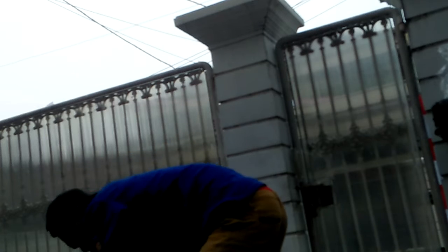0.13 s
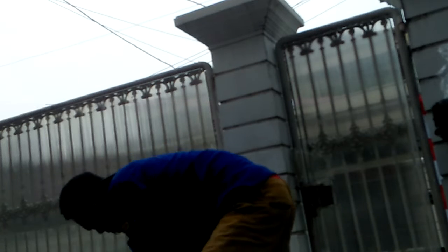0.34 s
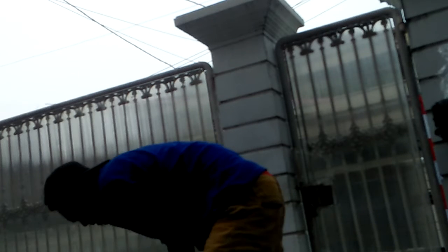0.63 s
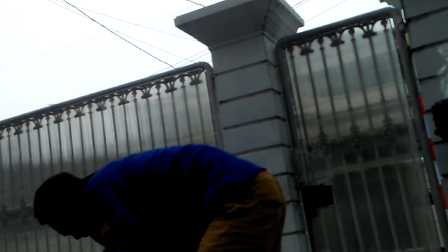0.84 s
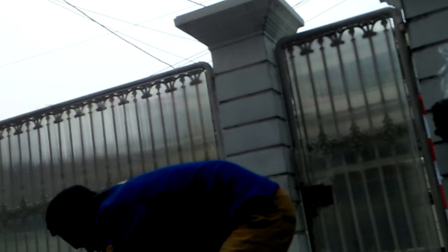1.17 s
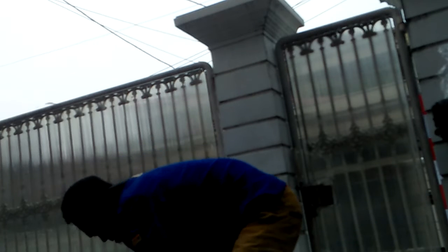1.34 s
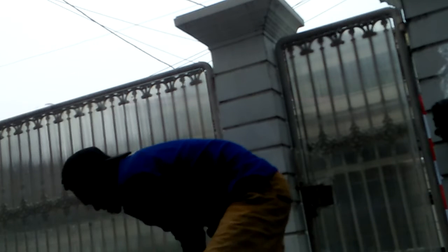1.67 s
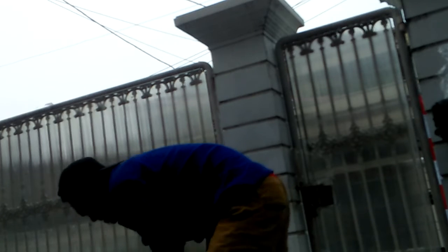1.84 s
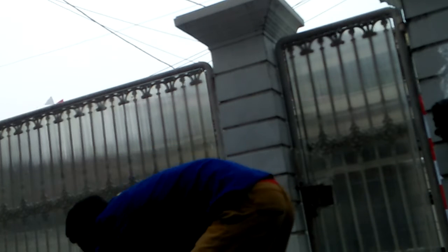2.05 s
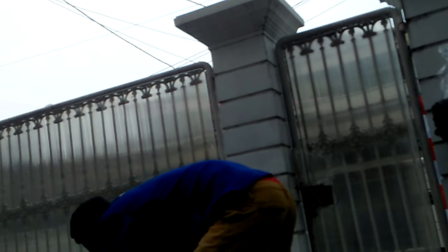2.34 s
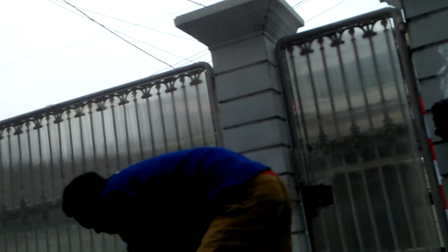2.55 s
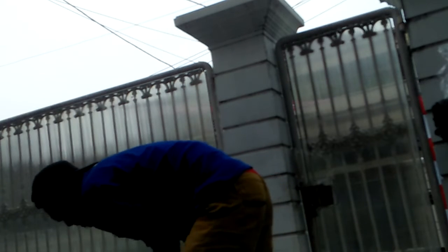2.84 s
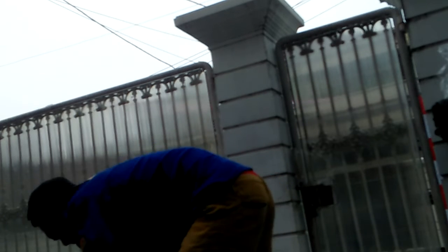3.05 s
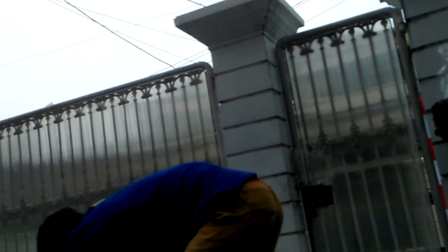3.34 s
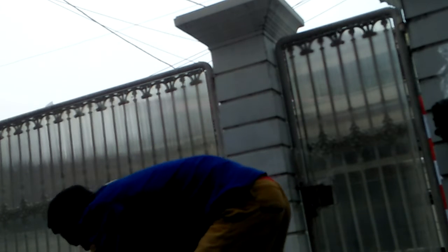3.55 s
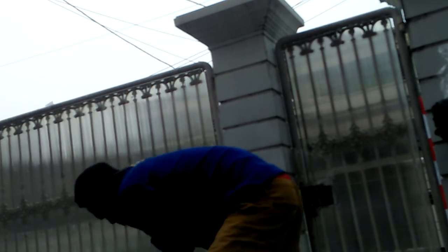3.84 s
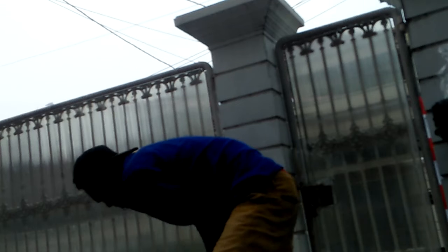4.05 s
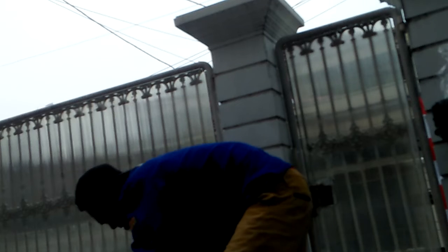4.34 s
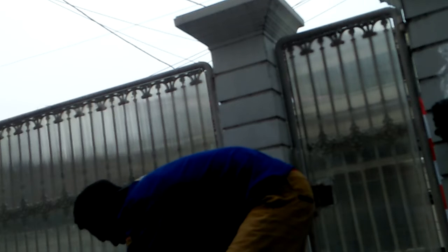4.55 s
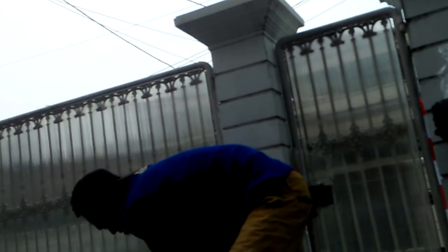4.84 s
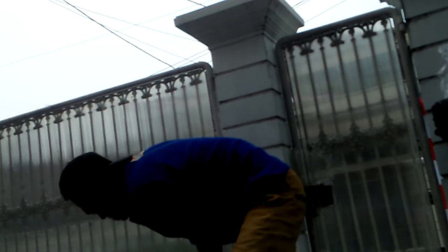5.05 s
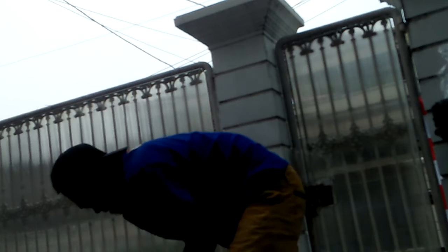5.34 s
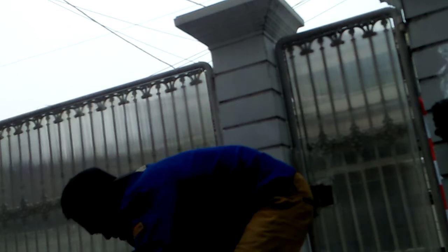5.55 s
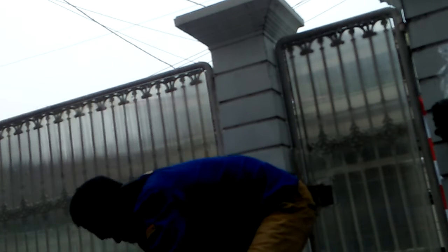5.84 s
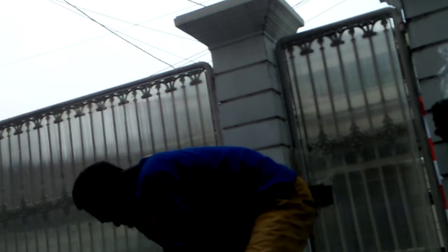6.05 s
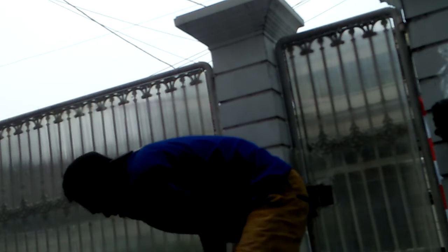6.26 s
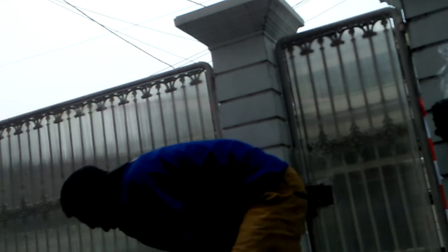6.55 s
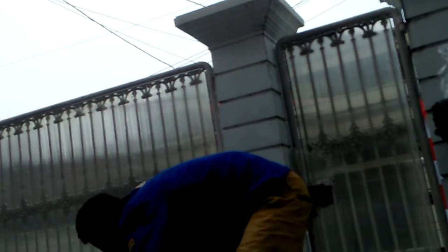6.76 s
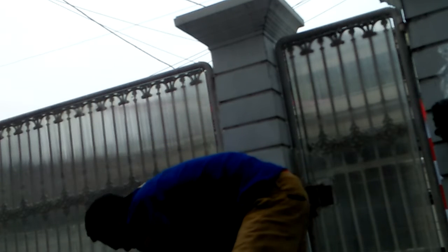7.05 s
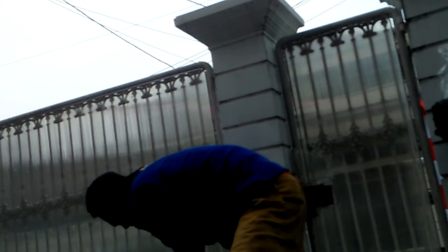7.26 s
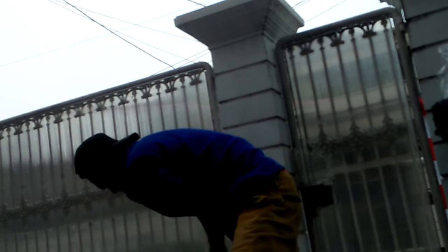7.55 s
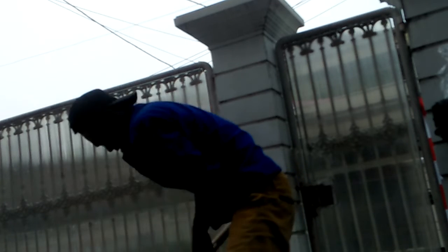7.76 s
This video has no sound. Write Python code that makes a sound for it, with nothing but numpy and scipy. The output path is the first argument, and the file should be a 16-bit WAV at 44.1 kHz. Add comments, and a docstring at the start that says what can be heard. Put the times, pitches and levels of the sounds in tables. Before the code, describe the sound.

A person bent over a gravel heap digs with a steel shovel at a regular pace. The blade rasps and rattles into loose stones, the steel ringing briefly before the load muffles it. Pebbles clack, low thuds mark pushes and footfalls, thrown grit hisses faintly, and stones tumble down with woody knocks and a small squeak. Gaps are almost silent. Outdoor yard, hard walls nearby, microphone close and centred.

```python
"""A steel shovel digs into a gravel heap seven times in a walled garden; the first stroke is under way.
Random stone contacts, filtered by the resonances of the shovel, give grit, stones, sand and heap.
Their levels rise as the edge bites and the push builds, then fall as the load is lifted.
Decaying tones, modes and noise bursts give jolts, clinks, chirps, knocks, thuds of the digging and of
footfalls, and squeaks, with wall reflections. Thrown sand hisses and landed stones roll in faint air."""
import sys
import numpy as np
from scipy import signal
from scipy.fft import rfft, irfft
from scipy.io import wavfile

SR = 44100
rng = np.random.default_rng(int(sys.argv[2]) if len(sys.argv) > 2 else 0)


def transcribe(u):
    """Save the signal u as a 16-bit wav file named by the first command-line argument.

    u: samples, shape (n,) or (channels, n), limited to [-1, 1]; the rate is SR.
    q: integer samples, one column per channel.
    """
    v = np.clip(np.atleast_2d(u).T, -1, 1)
    q = np.round(v * 32767).astype(np.int16)
    wavfile.write(sys.argv[1], SR, q)


N = 348831
SIZE = 16384  # samples of a filter response or a struck sound
FREQS = np.maximum(np.arange(SIZE // 2 + 1) * SR / SIZE, 1)  # Hz
AGE = np.arange(SIZE) / SR  # s since a sound began
TIME = np.arange(N) / SR  # s
CLOCK = np.arange(0, N / SR + .01, .001)  # s, coarse clock for level curves

# Strokes: (edge enters [s], full push [s], build-up [s], hold [s], grit gain at full push [dB],
# first bite against full push [dB], trend while held [dB/s], fall on lifting [dB/s],
# then gains against the grit: coarse stones [dB], leading pitch of those stones [Hz],
# sand [dB], shifting heap [dB], singing steel [dB])
STROKES = [ (-0.1, 0.215, 0.15, 0.062, -30, -3.5, 20, 68.5, -1.5, 868, -5, -10.5, 8.5),
           (1.227, 1.407, 0.11, 0.044, -33.5, -13.5, -8.5, 90.2, -2, 1105, -1.5, -9, -4),
           (2.395, 2.534, 0.073, 0.11, -32.5, -13.5, -24.5, 76.3, -3, 1172, -4.5, -16, 8),
           (3.443, 3.668, 0.097, 0.24, -31.5, -15, 15.5, 89.3, -3.5, 1060, -5, -14.5, 0),
           (4.695, 4.982, 0.1, 0.21, -33.5, -9.5, -21, 125.5, -8, 1257, -5, -13.5, -5.5),
           (5.807, 5.981, 0.083, 0.29, -34.5, -10.5, -18.5, 103.5, 0, 970, -4.5, -16.5, -0.5),
           (6.97, 7.208, 0.3, 0.12, -34.5, -13.5, 0.5, 102.8, -1, 1040, -3.5, -10.5, -6)]
# The load slides on the lifted blade:
# (time [s], hold [s], grit gain [dB], fall [dB/s], coarse stones against the grit [dB])
SLIDES = [(0.727, 0.011, -45.5, 112.5, -10), (1.597, 0.017, -36, 279.5, -7), (1.688, 0.11, -45, 83.5, -3.5),
          (2.833, 0.018, -60.5, 91.5, 3), (6.442, 0.042, -47, 88.5, -3), (7.605, 0.037, -54, 54.5, -5)]
# Resonances of the loaded blade, its thin edge and the shaft:
# (frequency [Hz], nominal width [Hz], nominal lift above the rattle [dB])
BLADE_MODES = [(985, 40, 3), (1308, 45, 8), (1873, 36, 12), (2030, 40, 5), (2196, 34, 9), (2458, 48, 7),
               (2605, 60, 6), (2756, 39, 7), (3025, 47, 7), (3154, 64, 9), (3380, 38, 9), (3528, 50, 9),
               (3736, 37, 8), (3884, 34, 10), (3955, 45, 8), (4050, 40, 8), (4123, 46, 10), (4240, 36, 12),
               (4428, 53, 9), (4584, 45, 10), (4745, 54, 8), (4868, 56, 12), (5071, 40, 9), (5243, 32, 11),
               (5340, 38, 13), (5690, 100, 11), (5840, 100, 11), (6290, 140, 8), (6450, 90, 9),
               (6567, 110, 12), (6860, 140, 6), (7120, 170, 9), (7420, 110, 8)]
EDGE_MODES = [(7950, 85, 8), (8110, 110, 5), (8255, 130, 5), (8441, 107, 3), (8710, 120, 4), (8950, 110, 3),
              (9410, 105, 7), (9715, 115, 6), (10002, 90, 6), (10292, 150, 6), (10540, 120, 4),
              (11143, 195, 6)]
SHAFT_MODES = [(153.8, 57, 6.45), (298.6, 47, 8.7), (453, 50, 8.3), (606.5, 63, 4.9), (744, 24, 6.9)]
# Least damped modes of the blade: (frequency [Hz], relative level [dB])
SINGING_MODES = [(1311, -8), (1873, 0), (2198, -5), (3030, -11), (4238, -6), (5340, -15)]
# Colour of stone on stone: (frequency [Hz], relative level [dB])
GRAVEL_COLOUR = [(25, -37), (70, -14), (370, -22), (600, -5.5), (1100, 5), (1600, 2.5), (2000, 9),
                 (2400, 0), (4500, -7), (6050, -13.5), (7700, -5.5), (8400, 4.5), (9200, -3), (13000, -18)]
# Colour of still garden air: (frequency [Hz], relative spectral level [dB per Hz])
AIR_COLOUR = [(25, -19), (60, 4), (180, -8.5), (400, -15.5), (1500, -16), (2400, -25), (3200, -40.5),
              (14000, -38.5)]
# The blade jolts against big stones:
# (time [s], peak level [dB], treble gain [dB], rattle t60 [s], gain of the ringing steel [dB])
JOLTS = [(0.042, -25, -23, 0.33, -29), (0.413, -21.5, -18, 0.15, -32), (0.556, -32, -7, 0.24, -35),
         (0.7354, -24.5, -31, 0.14, -27), (1.3567, -22.5, -5, 0.086, -47), (1.4105, -19, 9, 0.12, -40),
         (1.593, -17, 12, 0.021, -48), (1.878, -24.5, -6.5, 0.17, -32), (2.4767, -18, -18, 0.44, -27),
         (2.8667, -31, -2, 0.091, -39), (2.9106, -33.5, -12, 0.18, -34), (3.602, -23.5, -7, 0.17, -31),
         (3.6276, -19, -8, 0.068, -40), (3.8731, -13.5, -23, 0.061, -25), (4.093, -29, -5, 0.22, -33),
         (4.2232, -34, -11, 0.098, -44), (4.789, -21.5, 2, 0.1, 1.5), (4.8237, -17.5, -8.5, 0.51, -9),
         (4.9259, -15.5, -0.5, 0.34, -4), (4.9589, -16, -15, 0.048, -49), (5.2488, -29.5, 2, 0.15, -20),
         (5.9505, -19, -10, 0.45, -32), (6.2118, -26.5, -23, 0.055, -30), (6.421, -28.5, 6, 0.032, -34.5),
         (6.738, -39.5, -3, 0.17, -42), (7.178, -31, 6, .18, -24), (7.222, -15.5, -7.5, 0.094, -24),
         (7.309, -10, -5, 0.023, -51), (7.533, -34, 2, 0.17, -41)]
# Sand flies off the swinging blade:
# (time [s], hold [s], hiss level [dB], hiss fall [dB/s], low rustle level [dB])
THROWS = [(0.867, 0.12, -53, 263, -62.5), (2.05, 0.095, -50, 207, -64), (3.094, 0.46, -54, 56, -65.5),
          (4.41, 0.1, -61, 195, -64), (5.49, 0.079, -58.5, 366.5, -69.5), (6.703, 0.083, -52.5, 171, -80),
          (7.85, 0.1, -51, 200, -60)]
# Dull knocks of stones falling on stones: (time [s], peak level [dB], pitch [Hz])
KNOCKS = [(0.948, -33, 793), (3.089, -39.5, 650), (3.124, -30, 790), (3.172, -28.5, 940),
          (3.199, -33.5, 786), (3.265, -38.5, 1000), (3.532, -29, 670), (4.223, -31, 1404),
          (5.349, -41.5, 1090), (5.443, -45.5, 860), (4.357, -27, 1030), (4.384, -28, 820),
          (4.455, -23, 1040), (4.492, -28.5, 820), (4.528, -31.5, 1055), (4.54, -31.5, 810),
          (4.597, -31.5, 910), (4.618, -32.5, 900), (5.796, -19.5, 1050), (6.468, -28.5, 795),
          (6.502, -26, 775), (6.544, -31, 650), (7.223, -17, 1160), (7.672, -36.5, 1090)]
# Colour of flying sand: (frequency [Hz], relative level [dB])
SAND_COLOUR = [(300, -20), (1000, -16.5), (2200, -7.5), (4000, -11.5), (6000, -6), (7500, 0), (9200, 5),
               (11000, -5), (14000, -9.5)]
# Clinks and short chirps of the blade, its edge striking or scraping stones:
# (time [s], peak level [dB], nominal contact pitch [Hz],
# ring gain [dB], ring t60 [s], overtone gain [dB], contact time [s])
CLINKS = [(0.963, -41, 2430, -7, 0.34, -43, 0.0083), (1.217, -21.5, 2054, -16, 0.25, -32.5, 0.0039),
          (2.095, -40.5, 2380, -13, 0.29, -22, 0.013), (2.384, -23.5, 2070, -16, 0.12, -48, 0.0038),
          (3.195, -44, 2386, -19, 0.36, -44, 0.0033), (3.367, -38.5, 2224, -22, .22, -18.5, 0.0066),
          (3.439, -35, 2390, -22, 0.46, -32, 0.0035), (4.4723, -35, 2466, -1, 0.18, -50, 0.0059),
          (4.507, -36, 2305, -16, 0.12, -19, 0.005), (4.686, -23.5, 2106, -16.5, 0.14, -30, 0.0039),
          (5.268, -39, 4590, 2, 0.35, -45, 0.0087), (5.572, -37.5, 1914, -39.5, 0.089, -24, 0.0035),
          (5.761, -47, 2350, -18, 0.26, -44, 0.012), (6.963, -28, 2190, -18, 0.39, -42, 0.0033),
          (7.738, -40, 2425, -13, 0.36, -35, 0.013), (7.816, -37.5, 2143, -26, 0.59, -45, 0.0037)]
# Low thuds of the digging and of footfalls: (time [s], peak level [dB], pitch [Hz])
THUDS = [(1.34, -31.5, 157), (1.583, -31, 327), (2.128, -53, 156), (2.751, -47, 147), (3.536, -34, 153),
         (3.138, -42, 266), (3.669, -45.5, 202), (4.362, -46, 288), (4.49, -52, 285), (4.573, -48.5, 260),
         (4.716, -34.5, 154), (4.814, -33.5, 174), (4.917, -29, 147), (5.038, -35.5, 159),
         (5.788, -37, 144), (5.981, -33, 119), (7.021, -34.5, 187), (7.064, -24.5, 310), (7.3, -21.5, 295)]
# Hollow squeaks as the blade slides: (time [s], peak level [dB], mean pitch [Hz], length [s])
SQUEAKS = [(3.086, -56, 658, 0.045), (4.29, -42, 785, 0.077), (6.46, -31, 807, 0.029),
           (6.866, -48, 734, 0.1), (6.92, -52, 1100, 0.025)]
# Thrown stones roll on where they land: (time [s], hold [s], level [dB])
ROLLS = [(3.153, 0.15, -53), (4.3, 0.3, -52), (6.45, 0.037, -53)]

ENTRY_DB_PER_S = 1594.5  # how abruptly the edge bites
FILL_S = 0.17  # from full push until the blade is covered
BARE_STONES_DB, BARE_SAND_DB, BARE_HEAP_DB = 2.5, -4, 7  # bare blade against a covered one
MUFFLE_DB = -23.5  # the full load damps the singing steel
SLIDE_RISE_DB_PER_S = 510
SLIDE_SAND_DB, SLIDE_HEAP_DB = -4, -15.5  # against the grit
JUDDER_DB, JUDDER_PER_S = 0.65, 14  # the blade catches and slips
CLACK_DB = -4.5  # single pebbles against the grit gain
AIR_DB = -69.5  # rms
THROW_RISE_DB_PER_S, THROW_SAG_DB_PER_S, RUSTLE_FALL_DB_PER_S = 60.5, 32, 59
ROLL_RISE_DB_PER_S, ROLL_FALL_DB_PER_S = 400, 106.5
TOP_HZ = 14100


def undb(db):
    """Amplitude ratio: twenty decibels make a factor of ten."""
    return 10 ** (np.asarray(db) / 20)


def unit(x):
    """Normalisation to an rms of 1."""
    return x / np.sqrt(np.mean(x ** 2))


def fade(t60):
    """Exponential damping: a fall of 60 dB in t60 seconds, at least 2 ms."""
    return np.exp(-np.log(1000) * AGE / max(t60, .002))


def band(x, lo_hz, hi_hz, order=4):
    """Band limitation by a Butterworth band-pass."""
    edges = [lo_hz, min(hi_hz, SR / 2 - 1)]
    return signal.sosfilt(signal.butter(order, edges, "band", fs=SR, output="sos"), x)


def colour(points):
    """Spectral envelope: gain interpolated in dB over log frequency."""
    hz, db = np.transpose(points)
    return undb(np.interp(np.log(FREQS), np.log(hz), db))


def through(x, gain):
    """Minimum-phase filtering: folding the cepstrum makes the response causal."""
    cepstrum = irfft(np.log(gain))
    cepstrum[1:SIZE // 2] *= 2
    cepstrum[SIZE // 2 + 1:] = 0
    response = irfft(np.exp(rfft(cepstrum)))
    return signal.fftconvolve(x, response)[:len(x)]


def add(track, s, sound, db):
    """Superposition: add a sound at time s, its peak scaled to db."""
    i = max(int(s * SR), 0)
    track[i:i + SIZE] += (sound * undb(db) / np.abs(sound).max())[:N - i]


def wander(per_s):
    """Slow random modulation: per_s normal values a second, joined by straight lines."""
    return np.interp(TIME * per_s, np.arange(SIZE), rng.standard_normal(SIZE))


def per_sample(curve):
    """Linear interpolation of a level curve from the millisecond clock to every sample."""
    return np.interp(TIME, CLOCK, curve)


def swell_db(s, hold_s, rise, fall, sag=0):
    """Level envelope: attack up to time s, sagging hold, release; slopes in dB/s."""
    age = CLOCK - s
    attack = -rise * np.maximum(-age, 0)
    hold = -sag * np.clip(age, 0, hold_s)
    release = -fall * np.maximum(age - hold_s, 0)
    return attack + hold + release


def collisions(rate, spread_db, crumble_s, dust=0.05):
    """Granular shot noise: rate contacts a second, mostly small, each crumbling, over a bed of dust."""
    hit = rng.random(N) < rate / SR
    size = undb(spread_db * np.minimum(rng.exponential(size=N), 4))
    energy = hit * size ** 2 / np.mean(size ** 2) * SR / rate  # mean level independent of the rate
    keep = np.exp(-1 / (crumble_s * SR))
    power = signal.lfilter([1 - keep], [1, -keep], energy + abs(dust))
    return np.sqrt(power) * rng.standard_normal(N)


def shovel_gain(sharpness=1.15):
    """Resonance: the gravel spectrum is lifted at every mode of shaft, blade and edge."""
    hz, width, db = np.vstack([SHAFT_MODES, BLADE_MODES, EDGE_MODES]).T[:, :, None]
    detuning = 2 * (FREQS - hz) / width
    peaks = 2 * (undb(db) ** 2 - 1) / (1 + sharpness * detuning ** 2) ** 2
    return colour(GRAVEL_COLOUR) * np.sqrt(np.maximum(1 + peaks.sum(0), .1))


def effort():
    """Addition of power over strokes and slides; gains of grit, stones, sand, heap and steel."""
    power = 0
    for (entry_s, full_s, build_s, hold_s, db, bite_db, trend, fall,
         stones_db, _, sand_db, heap_db, steel_db) in STROKES:
        slack = np.clip((full_s - CLOCK) / build_s, 0, 1)
        push = swell_db(full_s, hold_s, 0, fall, -trend)
        entry = swell_db(entry_s, 0, ENTRY_DB_PER_S, 0)
        grit = db + bite_db * slack + push + entry
        covered_s = full_s + FILL_S
        bare = np.clip((covered_s - CLOCK) / (covered_s - entry_s), 0, 1)
        layers = [grit,
                  grit + stones_db + BARE_STONES_DB * bare,
                  grit + sand_db + BARE_SAND_DB * bare,
                  grit + heap_db + BARE_HEAP_DB * bare,
                  grit + steel_db + MUFFLE_DB * (1 - bare)]
        power = power + undb(layers) ** 2
    for s, hold_s, db, fall, stones_db in SLIDES:
        slide = undb(db + swell_db(s, hold_s, SLIDE_RISE_DB_PER_S, fall))
        balance = undb([0, stones_db, SLIDE_SAND_DB, SLIDE_HEAP_DB, MUFFLE_DB])
        power = power + np.outer(balance, slide) ** 2
    gains = np.array([per_sample(gain) for gain in np.sqrt(power)])
    return gains * undb(JUDDER_DB * wander(JUDDER_PER_S))


def shifting(turnover=22, narrow=1.0):
    """Modal excitation: the contact wanders over the blade, so its upper modes flare up in turn."""
    out = 0
    for hz, width, db in BLADE_MODES:
        if hz > 2400:
            swell = wander(turnover)
            push = rng.standard_normal(N) * undb(4.5 * swell)
            mode = signal.lfilter(*signal.iirpeak(hz, hz / (narrow * width), fs=SR), push)
            out = out + undb(db) * np.interp(hz, FREQS, colour(GRAVEL_COLOUR)) * mode
    return unit(out)


def tumbling(rate, lead_hz, sway_db=3.5, turnover=35, focus_db=5, count=7):
    """Size sets pitch: bands of coarse stones sway in level, and those near lead_hz prevail."""
    edges, out = np.geomspace(400, 1800, count + 1), 0
    for lo_hz, hi_hz in zip(edges, edges[1:]):
        octaves = np.log2(np.sqrt(lo_hz * hi_hz) / lead_hz)
        db = sway_db * wander(turnover) - focus_db * octaves ** 2
        out = out + undb(db) * band(collisions(rate, 1.9, 0.0005), lo_hz, hi_hz, order=2)
    return band(out, 370, 2050)


def steel(t60):
    """Free vibration: the least damped blade modes decay together."""
    hz, db = np.transpose(SINGING_MODES)
    return undb(db) @ np.sin(2 * np.pi * hz[:, None] * AGE) * fade(t60)


def singing(flow, t60=0.1):
    """Convolution of contacts with the modal ring: dragged stones keep the steel singing."""
    return unit(signal.fftconvolve(collisions(900 * flow, 0.93, 0.000089), steel(t60))[:N])


def clacks(lo_hz=850, hi_hz=5500, t60=0.055, spread_db=3.5, count=800, size=3000):
    """Impact: each pebble rings briefly at its own pitch with one inharmonic overtone."""
    out, age = np.zeros(N + size), AGE[:size]
    for when, pitch, strength, shape in rng.random((count, 4)):
        hz, i = lo_hz * (hi_hz / lo_hz) ** pitch, int(when * N)
        ring = np.sin(2 * np.pi * hz * age)
        ring = ring + .5 * np.sin(2 * np.pi * hz * (1.3 + shape) * age)
        level = undb(-spread_db * np.log(max(strength, .05)))
        out[i:i + size] += level * ring * np.exp(-np.log(1000) * age / t60)
    return unit(out[:N])


def digging(shovel):
    """Granular excitation of a resonator: a harder push moves more grains at once; mid and side."""
    grit_gain, stones_gain, sand_gain, heap_gain, steel_gain = effort()
    flow = 0.3 + (grit_gain / undb(-33.0)) ** 0.42
    grit = through(collisions(1200 * flow, 2.7, 0.00041), shovel)
    grit = unit(band(grit, 2235, 6970, order=6))
    grit = np.sqrt(.7) * grit + np.sqrt(.22) * shifting()
    entry_s, *_, stones_hz, _, _, _ = np.transpose(STROKES)
    lead_hz = stones_hz[np.searchsorted(entry_s[1:], TIME)]  # pitch of the current stroke
    stones = unit(through(tumbling(500 * flow, lead_hz), shovel))
    heap = unit(band(through(collisions(300 * flow, 2.7, 0.003), shovel), 38, 447))
    sand = through(collisions(2500 * (.5 + flow), 2.2, .0007), shovel)
    sand = unit(band(sand, 7700, 16000, order=6))
    mid = grit_gain * grit + stones_gain * stones + heap_gain * heap + sand_gain * sand
    mid = mid + steel_gain * singing(flow) + undb(CLACK_DB) * grit_gain * clacks()
    # of the digging, only the finest spray differs between left and right
    spray = through(collisions(4000 * flow, 2.2, .001), shovel ** .75)
    spray = unit(band(spray, 8000, 13500, order=4))
    return mid, undb(-12.5) * sand_gain * spray


def air():
    """Stationary noise: a steady, faint spectrum, weak in the treble."""
    return undb(AIR_DB) * unit(through(rng.standard_normal(N), colour(AIR_COLOUR)))


def jolts(shovel, contact_s=0.00069, crack_t60=0.02):
    """Impulsive excitation: a big stone cracks, rattles briefly and leaves the steel ringing."""
    out = np.zeros(N)
    for s, db, treble_db, t60, ring_db in JOLTS:
        decay = fade(crack_t60) + 0.57 * fade(t60)
        push = rng.standard_normal(SIZE) * decay * (1 - np.exp(-AGE / contact_s))
        body = band(push, 400, 3550, order=2)
        treble = undb(treble_db) * band(push, 3000, 15000, order=1)
        crack = through(body + treble, shovel)
        add(out, s, crack / np.abs(crack).max() + undb(ring_db) * steel(0.21), db)
    return out


def throws(shovel, side_db=-13):
    """Grain noise: loose sand hisses off the blade over a low rustle of the swing; mid and side."""
    hiss, swing = 0, 0
    for s, hold_s, hiss_db, fall, rustle_db in THROWS:
        hiss_curve = swell_db(s, hold_s, THROW_RISE_DB_PER_S, fall, THROW_SAG_DB_PER_S)
        swing_curve = swell_db(s, hold_s, THROW_RISE_DB_PER_S, RUSTLE_FALL_DB_PER_S)
        hiss = hiss + undb(hiss_db + hiss_curve)
        swing = swing + undb(rustle_db + swing_curve)
    hiss, swing = per_sample(hiss), per_sample(swing)
    tint = colour(SAND_COLOUR) * shovel ** .25
    sand, spray = (through(collisions(2500, 1.6, 0.0013), tint) for _ in range(2))
    rustle = unit(band(through(collisions(120, 4, .004), shovel), 70, 320, order=3))
    mid = hiss * unit(sand) + swing * rustle
    return mid, undb(side_db) * hiss * unit(band(spray, 7000, 14000))


def knocks():
    """Damped impact: a few cycles of a tone, then noise as the struck pile settles."""
    out = np.zeros(N)
    for s, db, hz in KNOCKS:
        settle = rng.standard_normal(SIZE) * (fade(0.0029) + 0.64 * fade(0.19))
        knock = np.sin(2 * np.pi * hz * AGE) * fade(0.039) + 2.5 * settle
        add(out, s, band(knock, 442, 1670), db)
    return out


def clinks(reach_hz=130, overtone=1.87, ping_life=8, sag=0.09, rough=0.35):
    """Selective excitation: a clink or falling chirp rings the blade modes near its pitch."""
    out = np.zeros(N)
    mode_hz = np.transpose(BLADE_MODES)[0]
    for s, db, hz, ring_db, t60, overtone_db, contact_s in CLINKS:
        share = 1 / (1 + ((mode_hz - hz) / reach_hz) ** 2) ** 2
        turns = mode_hz[:, None] * AGE + rng.random((len(mode_hz), 1))
        ring = share / share.max() @ np.sin(2 * np.pi * turns)
        ring = ring * (1 + 0.47 * unit(band(rng.standard_normal(SIZE), 11, 80, order=1)))
        crunch = unit(band(rng.standard_normal(SIZE), 0.86 * hz, 1.14 * hz, order=3))
        # the pitch sags; a longer contact draws the ping out to a chirp
        pitch = hz * (0.97 + sag * fade(2 * ping_life * contact_s))
        ping = np.sin(2 * np.pi * np.cumsum(pitch) / SR) + rough * crunch
        ping = ping * fade(ping_life * contact_s)
        upper_hz = hz * overtone
        upper = unit(band(rng.standard_normal(SIZE), .96 * upper_hz, 1.04 * upper_hz, order=2))
        upper = undb(overtone_db) * upper * fade(0.088)
        onset = np.tanh(AGE / contact_s) ** 2
        add(out, s, (ping + upper + undb(ring_db) * ring * fade(t60)) * onset, db)
    return out


def thuds():
    """Heavy damping: a low tone and noise die quickly, for the digging and for footfalls."""
    out = np.zeros(N)
    for s, db, hz in THUDS:
        thud = np.sin(2 * np.pi * hz * AGE) * fade(0.064)
        thud = thud + 3.0 * rng.standard_normal(SIZE) * fade(0.093)
        add(out, s, band(thud, 140, 480, order=2), db)
    return out


def squeaks(waver=0.052):
    """Frequency modulation: a slightly unsteady tone swells and dies in a half-sine."""
    out = np.zeros(N)
    for s, db, hz, length in SQUEAKS:
        pitch = hz * (1 + waver * unit(band(rng.standard_normal(SIZE), 8.1, 120, order=1)))
        swell = np.sin(np.pi * np.minimum(AGE / length, 1))
        add(out, s, np.sin(2 * np.pi * np.cumsum(pitch) / SR) * swell, db)
    return out


def rolls(rate=250, lead_hz=850):
    """Repeated impacts: landed stones tumble on, without the resonances of the shovel."""
    gain = 0
    for s, hold_s, db in ROLLS:
        gain = gain + undb(db + swell_db(s, hold_s, ROLL_RISE_DB_PER_S, ROLL_FALL_DB_PER_S))
    return per_sample(gain) * unit(through(tumbling(rate, lead_hz), colour(GRAVEL_COLOUR)))


def walls(x, t60=0.37, gap_s=0.015, wet_db=-15):
    """Diffuse reflection: a short decaying scatter from the gate and walls follows after a gap."""
    tail = band(rng.standard_normal(SIZE), 160, 11000, order=1) * fade(t60) * (AGE > gap_s)
    return x + undb(wet_db) * signal.fftconvolve(x, tail / np.linalg.norm(tail))[:N]


def scene():
    """Mid-side superposition: the work is straight ahead, with fine spray to the sides."""
    shovel = shovel_gain()
    scrape, scrape_side = digging(shovel)
    hiss, hiss_side = throws(shovel)
    impacts = jolts(shovel) + knocks() + clinks() + thuds() + squeaks()
    mid = scrape + air() + hiss + rolls() + walls(impacts)
    side = scrape_side + hiss_side
    return np.array([mid + side, mid - side])


def record(dry):
    """Low-pass filtering: a steep elliptic filter cuts the treble above TOP_HZ."""
    return signal.sosfilt(signal.ellip(10, .2, 80, TOP_HZ, fs=SR, output="sos"), dry)


dry = scene()
out = record(dry)
transcribe(out)
```